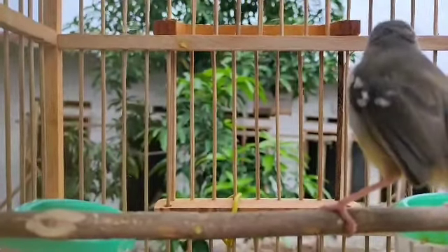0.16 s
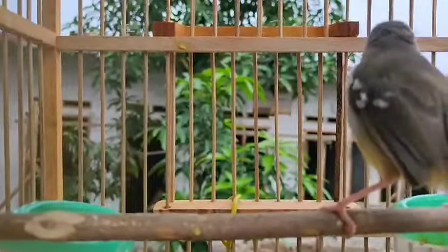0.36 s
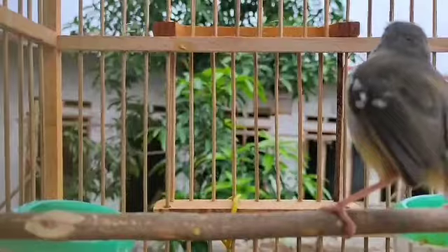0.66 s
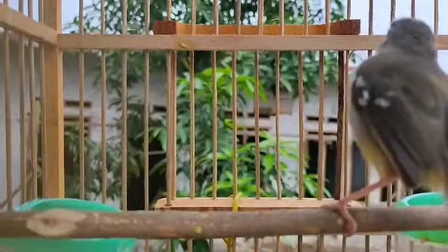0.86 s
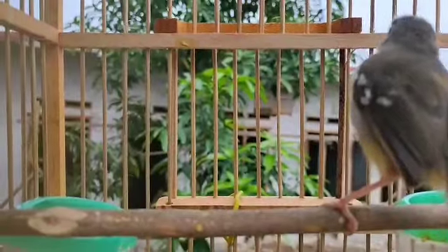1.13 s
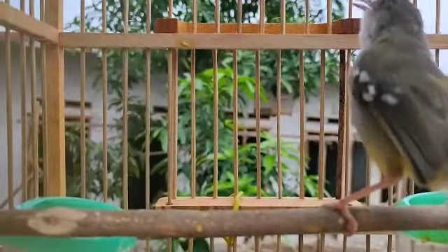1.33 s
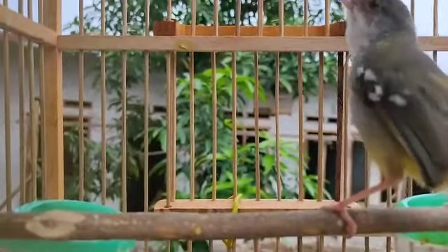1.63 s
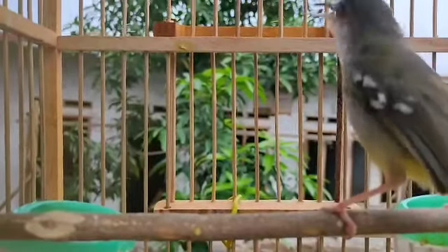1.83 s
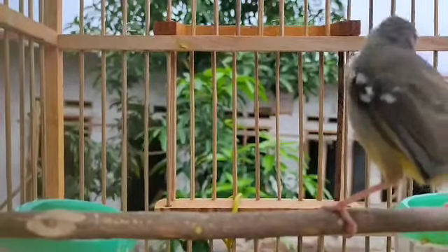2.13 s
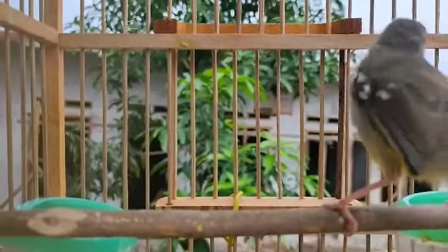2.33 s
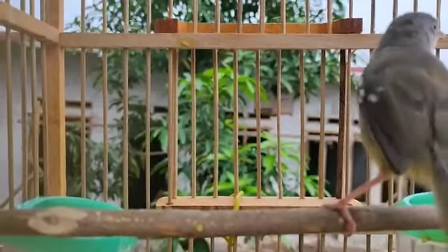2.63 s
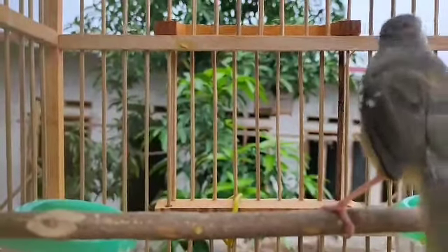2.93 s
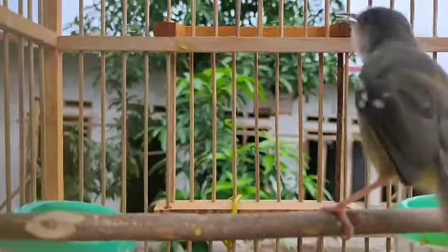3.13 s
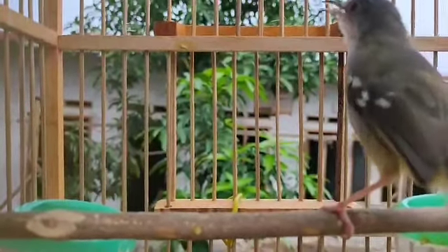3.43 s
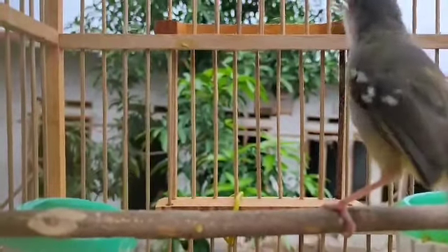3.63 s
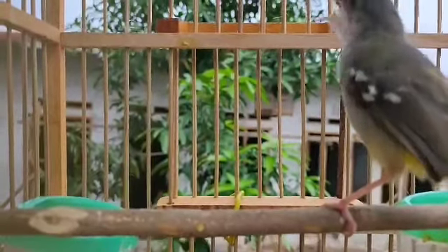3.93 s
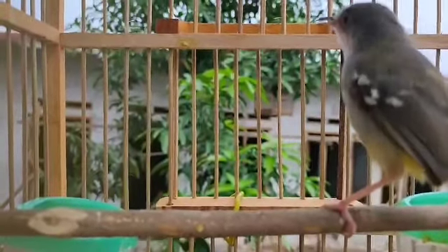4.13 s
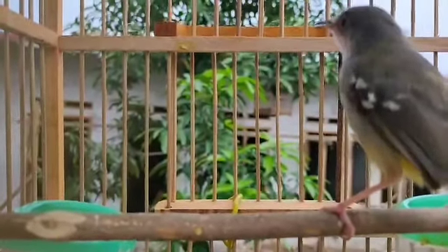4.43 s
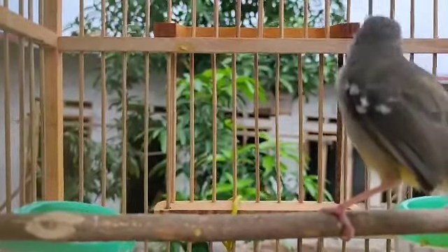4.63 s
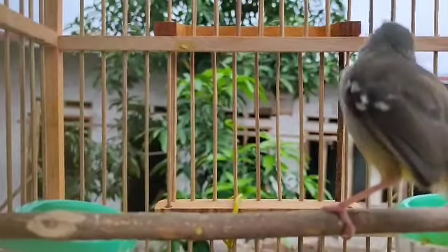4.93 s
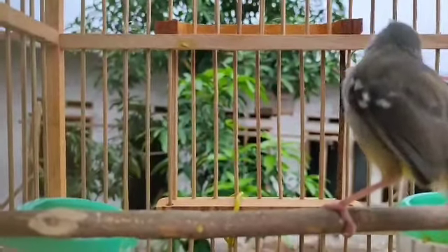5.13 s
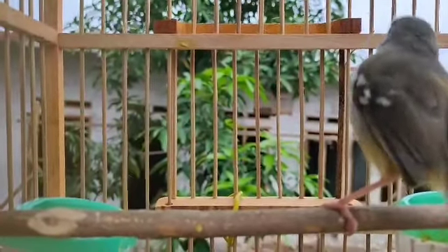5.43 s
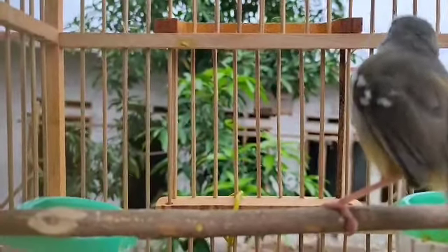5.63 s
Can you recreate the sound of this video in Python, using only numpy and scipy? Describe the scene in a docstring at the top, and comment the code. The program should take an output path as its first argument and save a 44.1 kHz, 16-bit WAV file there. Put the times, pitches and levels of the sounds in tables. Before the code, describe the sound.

A quiet outdoor yard between houses. For the first 1.3 seconds a thin high hiss flutters about thirteen times a second, with faint distant calls and soft low bumps; at about 0.9 seconds a short dull knock hits the cage frame, mostly on the left. At 1.4 seconds the caged bird, very close, gives a brief hoarse nasal call with two quick upward swings that sinks away. From 1.7 to 4.2 seconds come thirteen loud, piercing notes, roughly five a second: each flicks up reedily, peaks as a pure high whistle and slides down fast. The last five dip low and swing up again, sounding longer. Each rings briefly off the walls, with slight air puffs. After a quiet gap, about five softer, falling chirps answer from farther away between 4.6 and 5.2 seconds, blurred by reflections. Near 5.4 seconds soft bumps and the fluttering hiss return until the end.

```python
"""Outdoors between houses: a caged prinia sings close to the microphone, a nasal opening call, then 13 loud notes.
Each note is a swept oscillator: reedy upward flick, near-sine arch, slide down; decaying noise rings as the yard.
Farther falling chirps answer late, the lower ones with a strong octave in mid-fall; faint noise bands are
distant calls and one broad patch of hiss at the start. Before and after the song, pulsed noise makes a high
hiss and decaying noise makes soft low bumps; one short low sine is a knock on the cage frame."""
import sys
import numpy as np
from scipy import signal
from scipy.fft import rfft, irfft, next_fast_len
from scipy.io import wavfile
from scipy.ndimage import uniform_filter1d, minimum_filter1d

SR = 44100
rng = np.random.default_rng(int(sys.argv[2]) if len(sys.argv) > 2 else 0)


def wrap_up_sound(samples):
    """Save the sound to the file named by the first command line argument, as 16-bit audio."""
    columns = np.atleast_2d(samples).T
    # keep every value between -1 and 1, then stretch to whole-number steps
    tamed = np.clip(columns, -1, 1)
    steps = np.round(tamed * 32767).astype(np.int16)
    wavfile.write(sys.argv[1], SR, steps)


N = 254898
TIME = np.arange(N) / SR


def from_db(db):
    """Decibels to amplitude gain."""
    return 10 ** (np.asarray(db) / 20)


def rms_one(x):
    """Scale to rms 1."""
    return x / np.sqrt(np.mean(x ** 2) + 1e-20)


def at_hz(points, hz):
    """Interpolate a spectrum on a log-frequency axis."""
    f, value = np.transpose(points)
    return np.interp(np.log(np.maximum(hz, 1)), np.log(f), value)


def bin_hz(size):
    """Frequencies of the rfft bins."""
    return np.arange(size // 2 + 1) * SR / size


def coloured(x, spectrum):
    """Zero-phase filter with a smooth frequency response."""
    length = x.shape[-1]
    size = next_fast_len(length + 4096)
    gain = from_db(at_hz(spectrum, bin_hz(size)))
    return irfft(rfft(x, size) * gain, size)[..., :length]


def panned(pair, balance):
    """Share the power at each frequency between left and right; balance is left minus right, dB."""
    sides = []
    for sign in (1, -1):
        sides.append([(hz, 10 * np.log10(2 / (0.5 + 10 ** (-sign * db / 10)))) for hz, db in balance])
    return np.array([coloured(x, side) for x, side in zip(pair, sides)])


def noise(spectrum, alike):
    """Coloured stereo noise of rms 1; alike is the power share common to both sides."""
    alike = np.clip(alike, 0, 1)
    common = np.sqrt(alike) * rng.standard_normal(N)
    separate = np.sqrt(1 - alike) * rng.standard_normal((2, N))
    return rms_one(coloured(common + separate, spectrum))


def drift(cutoff_hz, size):
    """Smooth random wavering of spread 1: lowpassed noise, filter start-up discarded."""
    sos = signal.butter(2, min(cutoff_hz, SR / 4), fs=SR, output="sos")
    white = rng.standard_normal(max(size, SR // 2) + SR // 4)
    return rms_one(signal.sosfilt(sos, white)[SR // 4:])[:size]


def delayed(x, ms):
    """The same sound a little later."""
    return np.interp(TIME - ms / 1000, TIME, x, left=0)


def share(t, start_s, length_s):
    """Linear progress of a movement, 0 to 1."""
    return np.clip((t - start_s) / max(length_s, 1e-4), 0, 1)


def stretch(start_s, length_s):
    """Sample indices of one note and the time since it began."""
    t = np.arange(int(length_s * SR)) / SR
    return int(start_s * SR) + np.arange(len(t)), t


def envelope(t, db, attack_s, release_s):
    """Amplitude of a note: linear attack and release around its level as sine rms."""
    return np.sqrt(2) * from_db(db) * share(t, 0, attack_s) * share(t[-1] - t, 0, release_s)


def phase_of(hz, jitter):
    """Phase of a slightly unsteady oscillator."""
    return 2 * np.pi * np.cumsum(hz * (1 + jitter * drift(490, len(hz)))) / SR


def partial(multiple, hz, phase):
    """One overtone, muted near and above Nyquist."""
    return np.sin(multiple * phase) * (multiple * hz < .45 * SR)


# Outdoor air, low part: f/Hz, relative density/dB
AIR_SPECTRUM = [(15, -41), (25, -3), (75, -8.5), (157, -8), (389, -22.5), (445, -23.5), (859, -23.5),
                (1110, -24), (1400, -43.5), (1820, -75.5), (3080, -120)]


def quiet_air():
    """Steady noise: a low floor plus a much fainter treble part."""
    low = from_db(-73.5) * noise(AIR_SPECTRUM, alike=0.67)
    treble = noise([(1000, 0.5), (6000, -7.0), (9000, -24), (16000, -21)], alike=0.13)
    return low + from_db(-80.0) * treble


# Hiss base level under the swells: t/s, level/dB
HISS_LEVEL = [(0, -52.5), (.18, -59.5), (.27, -51), (.4, -56), (.9, -55), (1.3, -55), (1.39, -60),
              (1.7, -83.5), (5.39, -76), (5.43, -62.5), (5.78, -55)]
# Hiss colour: f/Hz, relative density/dB
HISS_SPECTRUM = [(350, -60), (600, -38), (834, -28.5), (970, -36.5), (1070, -42), (1590, -10),
                 (2570, -16.5), (3430, -6.5), (3890, -6.5), (6550, 6), (8050, -7.5), (9490, -27.5),
                 (11500, -32.5), (16000, -41)]
# Hiss balance: f/Hz, left minus right/dB
HISS_PAN = [(1300, 0), (2400, 0.5), (4400, 5), (8100, 5.5), (15000, -0.5)]
# Runs of swells: start t/s, end t/s, rate/(1/s)
HISS_RUNS = [(.042, 1.33, 13.05), (5.424, 5.76, 11)]
SWELL_DB, SWELL_SPREAD_DB = -52.5, 4.1


def hiss(rise_s, fall_s, flicker_db):
    """High noise swelling 11-13 times a second; exponential swells of random strength add in power."""
    power = from_db(np.interp(TIME, *np.transpose(HISS_LEVEL))) ** 2
    steady = from_db(flicker_db * drift(90, N)) * panned(noise(HISS_SPECTRUM, alike=0.067), HISS_PAN)
    times = np.concatenate([np.arange(start, end, 1 / rate) for start, end, rate in HISS_RUNS])
    strengths_db = SWELL_DB + SWELL_SPREAD_DB * rng.standard_normal(len(times))
    for s, db in zip(times, strengths_db):
        distance = np.maximum((s - TIME) / rise_s, (TIME - s) / fall_s)
        power = power + from_db(db) ** 2 * np.exp(-np.minimum(distance, 20))
    return np.sqrt(power) * steady


# Low bumps: t/s, level before decay and pan/dB, t60/s
BUMPS = [(.01, -64.5, 0.98), (.11, -64.5, 1), (.93, -53.5, 0.57), (5.36, -67.5, 0.485), (5.44, -64, .6)]
# Bump colour: f/Hz, relative density/dB
BUMP_SPECTRUM = [(15, -39), (25, -2), (97, 2.5), (145, -3), (233, -25), (314, -29), (500, -38), (650, -74),
                 (1100, -120)]


def bumps(rise_s, pan_db):
    """Soft, dull knocks: low noise under exponential decays, louder on the left."""
    level = np.zeros(N)
    for s, db, t60 in BUMPS:
        level += from_db(db - 60 * np.clip((TIME - s) / t60, 0, 2)) * share(TIME, s, rise_s)
    return level * noise(BUMP_SPECTRUM, alike=0.81) * from_db([[pan_db / 2], [-pan_db / 2]])


# Faint noise bands, distant calls and one broad patch of hiss at the start:
# start t/s, end t/s, centre f/Hz, width/Hz, level/dB
FAINT_BANDS = [(0.194, 0.332, 3520, 250, -59), (0.37, 0.522, 1010, 302, -69),
               (0.926, 1.027, 1525, 200, -66), (1.14, 1.35, 1950, 300, -71), (.02, .3, 2700, 700, -67),
               (4.89, 5.2, 733, 45, -74.5), (4.875, 5.19, 1523, 130, -71), (4.875, 5.03, 1020, 130, -72),
               (4.88, 4.99, 2246, 196, -65)]


def faint_bands(fade_s):
    """Each band is a carrier with two random quadrature amplitudes, faded in and out."""
    out = np.zeros(N)
    for start, end, hz, width, db in FAINT_BANDS:
        gate = np.clip(np.minimum(TIME - start, end - TIME) / fade_s, 0, 1)
        phase = 2 * np.pi * hz * TIME
        band = drift(width / 2, N) * np.sin(phase) + drift(width / 2, N) * np.cos(phase)
        out += from_db(db) * gate * band
    return out


def thud(start_s, hz, db, t60):
    """One soft knock on the cage frame: a few low decaying cycles, mostly on the left."""
    t = np.clip(TIME - start_s, 0, 1)
    swing = np.sin(2 * np.pi * hz * t) * (1 - np.exp(-(t * hz) ** 2))
    return swing * from_db(db - 60 * np.minimum(t / t60, 2)) * from_db([[0], [-10]])


def call(span, hz, level, octave_by_pitch, jitter, half_db, upper_db):
    """Slightly hoarse note: octave set by pitch, weak upper overtones, half-order lines from uneven cycles."""
    phase = phase_of(hz, jitter)
    halves = from_db(half_db) * (partial(3 / 2, hz, phase) + partial(5 / 2, hz, phase) / 10)
    octave = from_db(at_hz(octave_by_pitch, hz)) * (partial(2, hz, phase) + halves)
    upper = sum(partial(k, hz, phase) / k / (1 + (k * hz / 9000) ** 4) for k in range(3, 10))
    hoarse = 1 + .08 * drift(500, len(span))
    out = np.zeros(N)
    out[span] = level * hoarse * (np.sin(phase) + octave + from_db(upper_db) * upper)
    return out


# Opening call track: t/s, pitch f/Hz, fundamental level before the mix/dB
OPENING_TRACK = [(1.392, 1380, -34), (1.402, 3705, -14.5), (1.412, 1628, -27.5), (1.425, 2580, -12.5),
                 (1.436, 2530, -14.5), (1.45, 1714, -30), (1.459, 1565, -30), (1.48, 1752, -26.5),
                 (1.517, 1560, -29.5), (1.551, 1282, -42.5), (1.566, 1110, -61)]
# Octave overtone, dominant at low pitch: pitch f/Hz, level re fundamental/dB
OPENING_OCTAVE = [(1250, 18), (1450, 15), (1600, 7.5), (1760, 4.5), (2400, -29), (3700, -38)]


def opening_call(fade_s):
    """Two quick upward swings, then a low nasal note that sinks away."""
    s, pitch, level = np.transpose(OPENING_TRACK)
    span, t = stretch(s[0], s[-1] - s[0])
    hz, db = [uniform_filter1d(np.interp(s[0] + t, s, c), size=110) for c in (pitch, level)]
    amplitude = envelope(t, db, fade_s, fade_s)
    return call(span, hz, amplitude, OPENING_OCTAVE, jitter=.009, half_db=-12, upper_db=-12)


def beak(voice, low_hz):
    """Highpass: so small a bird radiates almost nothing below about a kilohertz."""
    return signal.sosfilt(signal.butter(6, low_hz, "high", fs=SR, output="sos"), voice)


# Air noise of the voice: f/Hz, relative density/dB
RASP_SPECTRUM = [(300, -25.5), (900, -24), (1600, -2.5), (5000, 5), (7500, 2), (9300, 3.5), (11000, -19),
                 (12400, 0), (13700, -8.5), (15200, 2.5)]


def rasp(voice, rasp_db, soft_edge_db, flicker_db):
    """Air noise follows the voice's slope; a wider smoothing window softens the noise's start and end."""
    force = np.gradient(voice) ** 2
    wide = uniform_filter1d(uniform_filter1d(force, size=660), size=440)
    narrow = uniform_filter1d(force, size=130)
    effort = np.sqrt(np.abs(narrow + from_db(soft_edge_db) ** 2 * wide))
    return from_db(rasp_db + flicker_db * drift(120, N)) * effort * noise(RASP_SPECTRUM, alike=0.13)


# Diffuse tail colour: f/Hz, gain/dB
YARD_COLOUR = [(300, -5.5), (1200, -0.5), (2000, -2.5), (3000, -1.5), (4500, -2.5), (6200, -1), (7500, -10),
               (10000, -3), (15000, -8.5)]


def yard(x, t60, build_s):
    """Diffuse reflections from the houses: convolution with noise that builds quickly and decays."""
    t = TIME[:SR]
    tail = rng.standard_normal((2, SR)) * from_db(-60 * t / t60) * (1 - np.exp(-t / build_s))
    tail = coloured(tail / np.sqrt(np.sum(tail ** 2, axis=1, keepdims=True)), YARD_COLOUR)
    return signal.fftconvolve(x[None], tail, axes=1)[:, :N]


# Stereo phase of the voice: f/Hz, left lead/rad
SONG_PHASE = [(0, 1), (950, -1.74), (2070, -0.37), (2500, -1.92), (3530, 0.57), (4570, -5.5), (5940, -10),
              (6460, -18), (7150, -17), (8790, -18), (10700, -10.5), (13200, 1), (14500, -5.5),
              (15700, -3.5)]
# Reflections from cage and wall: delay/ms, left level/dB, right level/dB
ECHOES = [(1.3, -17.5, -31), (2.705, -27.5, -11.5), (4.652, -28, -11), (8, -25, -14.5), (21, -20.5, -27)]
# Voice balance: f/Hz, left minus right/dB
SONG_PAN = [(60, -2.5), (92, -2), (140, -16.5), (210, -3), (330, -10), (500, 1), (770, 6), (1170, -3.5),
            (1790, -0.5), (2740, -5), (4190, -2.5), (6410, 3.5), (9810, -30.5), (15000, -1.5)]


def cage(voice):
    """The two ports hear the bird out of phase; near-surface echoes make each glide flutter."""
    size = next_fast_len(N + 4096)
    lead = np.interp(bin_hz(size), *np.transpose(SONG_PHASE))
    left_direct = irfft(rfft(voice, size) * np.exp(1j * lead), size)[:N]
    echoes = sum(from_db([[left], [right]]) * delayed(voice, ms) for ms, left, right in ECHOES)
    return panned(np.array([left_direct, voice]) + echoes, SONG_PAN)


# Levels in both note tables precede CARRYING and the mix; puff level precedes its envelope and pan.
# Notes that slide and stop: t/s, flick/s, arch/s, top f/Hz, slide/s, end f/Hz, slide bend (0 = straight),
# flick level/dB, arch level/dB, slide-end level/dB, slide roughness (0-1), air puff level/dB
SLIDES = [(1.688, .011, 0.019, 6305, .055, 2730, 2.3, -33.5, -16.5, -11.5, .5, -62),
          (2.100, 0.012, .0245, 6075, .038, 2907, 4.04, -33.5, -13, -17, 0.77, -81),
          (2.261, .012, 0.024, 6220, 0.041, 2984, 2.8, -34.5, -7.5, -20.5, .2, -65.5),
          (2.425, .012, .023, 5990, 0.041, 2873, 0.12, -35.5, -8, -16.5, .2, -75.5),
          (2.999, .012, 0.019, 6147, 0.053, 2490, 1.7, -31.5, -9, -12.5, .2, -64)]
# Notes whose slide is caught, swings up or levels off, then sags: same columns, then
# rise/s, crest f/Hz, sag/s, last f/Hz, crest level/dB
HOOKS = [(1.877, .012, 0.028, 6220, .015, 4037, 2.5, -33, -12, -13.5, .4, -54, .002, 4015, .05, 2690, -12),
         (2.616, 0.015, .022, 6263, .023, 3240, 1, -31, -11, -13.5, 0.2, -60.5, 0.0081, 3188, 0.017, 1500, -13),
         (2.805, 0.015, .022, 6237, .041, 1590, 0.43, -32, -10, -16, 0.19, -70, 0.0098, 1912, 0.0092, 1530, -11.5),
         (3.175, .011, .0158, 5970, 0.04, 2078, 3.5, -33, -11, -8.5, 0.95, -71, .024, 2520, 0.0037, 2420, -17.5),
         (3.3756, .012, 0.021, 6195, 0.03, 1368, 0.16, -35, -14.5, -9, 0.92, -59.5, 0.03, 3383, .032, 3064, -12.5),
         (3.602, .012, 0.017, 6100, 0.03, 1400, -0.2, -31.5, -12, -9.5, 0.48, -53.5, .031, 3432, .023, 3110, -10.5),
         (3.8245, .012, .0145, 6128, .034, 1316, -0.6, -34.5, -11.5, -7.5, 0.63, -52, .033, 3300, 0.031, 2764, -10),
         (4.061, .010, .0115, 5990, .030, 1376, 2.0, -54, -11, -10, 0.98, -54, .0255, 3612, 0.048, 2308, -10)]
# Throat and beak resonance: pitch f/Hz, gain/dB
CARRYING = [(1200, -32), (1550, -18), (2050, -9.5), (2400, -10.5), (3000, -2), (3500, -1), (4000, -3.5),
            (4330, -3), (4600, 3), (4900, 2), (5400, 0), (6200, -.5)]
FLICK_FROM_HZ, FLICK_TO_HZ, FLICK_CURVE = 1300, 5220, 1.4
ARCH_FLATNESS, RISE_CURVE, SAG_CURVE = 2.3, 1.7, 0.88
ATTACK_S, SWELL_CURVE, RELEASE_S = 0.0058, 3.1, .014
DROOP_S, DROOP_SHARE = .008, 0.39
# Random tremble of a rough slide: bandwidth, pitch share and level depth at full strain
TREMBLE_HZ, TREMBLE_SHARE, TREMBLE_DB = 260, .035, 3


def note(start_s, flick_s, arch_s, top_hz, slide_s, end_hz, bend, flick_db, arch_db, end_db,
         roughness, puff_db, *hook):
    """Samples, pitch and amplitude of one note: flick, arch, slide, optional hook, closing droop."""
    rise_s, crest_hz, sag_s, last_hz, crest_db = hook or (0, end_hz, 0, end_hz, end_db)
    slide_at = flick_s + arch_s
    rise_at = slide_at + slide_s
    droop_at = rise_at + rise_s + sag_s
    span, t = stretch(start_s, droop_at + DROOP_S)
    flick = share(t, 0, flick_s)
    arch = share(t, flick_s, arch_s)
    slide = share(t, slide_at, slide_s)
    rise = share(t, rise_at, rise_s)
    sag = share(t, rise_at + rise_s, sag_s)
    droop = share(t, droop_at, DROOP_S)

    bent_slide = np.expm1(-bend * slide) / np.expm1(-bend) if bend else slide
    hz = (FLICK_FROM_HZ * (FLICK_TO_HZ / FLICK_FROM_HZ) ** flick ** FLICK_CURVE
          + (top_hz - FLICK_TO_HZ) * (1 - np.abs(2 * arch - 1) ** ARCH_FLATNESS)
          + (end_hz - FLICK_TO_HZ) * bent_slide
          + (crest_hz - end_hz) * rise ** RISE_CURVE
          + (last_hz - crest_hz) * sag ** SAG_CURVE)
    # least steady early in the slide
    strain = roughness * np.sin(np.pi * np.sqrt(slide))
    hz = hz * (1 + TREMBLE_SHARE * strain * drift(TREMBLE_HZ, len(t)) - DROOP_SHARE * droop)

    whistle_db = arch_db + (end_db - arch_db) * slide + (crest_db - end_db) * rise
    whistle_db = whistle_db + at_hz(CARRYING, hz) + TREMBLE_DB * strain * (drift(TREMBLE_HZ, len(t)) - 1)
    level_db = flick_db + (whistle_db - flick_db) * flick ** SWELL_CURVE
    return span, hz, envelope(t, level_db, ATTACK_S, RELEASE_S)


# Throat response to the reedy overtones: f/Hz, gain/dB
THROAT = [(2600, 0), (3800, -11), (5000, 7.5), (6800, 5), (8300, -0.5), (10000, -23.5), (15000, -24)]
# Pure-whistle overtones: multiple of pitch, level/dB before OVERTONES_BY_PITCH
WHISTLE_PARTIALS = [(.5, -31.5), (1.5, -33), (2, -29.5), (3, -37.5)]
# Overtone gain, least at the top and more during the slide: pitch f/Hz, gain/dB
OVERTONES_BY_PITCH = [(1500, 0), (3000, -1), (4300, 6), (5200, -1), (6100, -2.5)]


def song(reedy_db, low_reedy, break_hz):
    """The syrinx slaps shut while the pitch flicks up, then swings freely as a near sine."""
    out = np.zeros(N)
    for row in SLIDES + HOOKS:
        span, hz, level = note(*row)
        phase = phase_of(hz, jitter=.004)
        # reedy until the pitch first passes break_hz, slightly so again when it sinks low
        opening_flick = np.maximum.accumulate(hz) < break_hz
        reedy = uniform_filter1d(np.maximum(opening_flick, low_reedy * (hz < 2100)), size=44)
        # reedy overtones stop growing once the fundamental takes over
        drive = reedy * np.minimum(level, from_db(-20.5))
        reed = sum(from_db(reedy_db + at_hz(THROAT, k * hz)) * partial(k, hz, phase) for k in range(2, 9))
        overtones = sum(from_db(db) * partial(round(2 * k) / 2, hz, phase) for k, db in WHISTLE_PARTIALS)
        overtone_gain = from_db(3.5 * drift(200, len(span)) + at_hz(OVERTONES_BY_PITCH, hz))
        out[span] += level * (np.sin(phase) + overtones * overtone_gain) + drive * reed
    return out


# Puff colour: f/Hz, relative density/dB
PUFF_SPECTRUM = [(40, -7.5), (110, 1), (200, -2.5), (380, 0.5), (600, -5), (1000, -4.5), (1600, -27.5)]


def puffs(rise_s, t60):
    """The body jerks as each flick ends and stirs a little air: decaying noise, louder on the right."""
    level = np.zeros(N)
    for row in SLIDES + HOOKS:
        s, db = row[0] + row[1], row[11]
        level += from_db(db - 60 * np.clip((TIME - s - rise_s) / t60, 0, 2)) * share(TIME, s, rise_s)
    return level * noise(PUFF_SPECTRUM, alike=0.42) * from_db([[-2], [2]])


# Chirps from farther off: start t/s, length/s, first f/Hz, last f/Hz, time to mid-drop/s, drop scale/s,
# first level/dB, last level/dB (fundamental, before the mix)
FAR_CHIRPS = [(4.645, 0.082, 6490, 5220, 0.05, 0.015, -35, -42),
              (4.678, 0.088, 3915, 2445, 0.048, 0.041, -50.5, -48),
              (4.912, 0.064, 6600, 4645, 0.02, 0.046, -46, -56.5),
              (4.978, 0.062, 4416, 2355, .026, .04, -41.5, -47),
              (5.141, 0.073, 6365, 4990, 0.049, 0.013, -37.5, -40.5)]
# Octave overtone, strong only near 3300 Hz: pitch f/Hz, level re fundamental/dB
FAR_OCTAVE = [(2450, -11), (3300, 6), (3800, -11), (4700, -7), (5400, -59), (6500, -27)]
FAR_FADE_S = 0.018


def far_chirp(start_s, length_s, first_hz, last_hz, drop_at_s, drop_s, first_db, last_db):
    """A held pitch that drops to a lower one along an S curve."""
    span, t = stretch(start_s, length_s)
    drop = (1 + np.tanh(2 * (t - drop_at_s) / drop_s)) / 2
    hz = first_hz + (last_hz - first_hz) * drop
    level = envelope(t, first_db + (last_db - first_db) * drop, FAR_FADE_S, FAR_FADE_S)
    return call(span, hz, level, FAR_OCTAVE, jitter=.0074, half_db=-35, upper_db=-20)


def scene():
    """Mix the near bird, the far sounds, the hiss, the bumps and the quiet outdoor air."""
    background = quiet_air() + hiss(rise_s=.004, fall_s=0.011, flicker_db=1.5)
    knocks = bumps(rise_s=0.0074, pan_db=14.0) + thud(start_s=.905, hz=105, db=-18.5, t60=0.052)

    opening = opening_call(fade_s=.004)
    voice = beak(song(reedy_db=6.5, low_reedy=0.058, break_hz=4610) + opening, low_hz=1262)
    # the opening call drives an extra share of air noise
    breath_source = voice + from_db(-9) * beak(opening, low_hz=1262)
    airflow = rasp(breath_source, rasp_db=-20.0, soft_edge_db=-3.0, flicker_db=3.5)
    ringing = from_db(-16.5) * yard(voice + from_db(9.5) * airflow[0], t60=0.48, build_s=.003)
    near = from_db(-2.0) * cage(voice) + airflow + ringing + puffs(rise_s=0.0082, t60=0.28)

    chirps = sum(far_chirp(*row) for row in FAR_CHIRPS)
    # the left side is earlier and louder
    direct = np.array([chirps, delayed(chirps, ms=0.421)])
    answers = from_db(-0.5) * direct + from_db(2.0) * yard(chirps, t60=0.55, build_s=0.0012)
    far = answers * from_db([[2], [-2]]) + faint_bands(fade_s=0.037)
    return near + far + background + knocks


CUTOFF_HZ = 15900


def record(dry):
    """A fast limiter holds the highest peaks under full scale; a steep lowpass then cuts the top."""
    headroom = np.minimum(1, .95 / (np.abs(dry).max(axis=0) + 1e-9))
    gain = uniform_filter1d(minimum_filter1d(headroom, size=177), size=177)
    return coloured(dry * gain, [(CUTOFF_HZ - 300, 0), (CUTOFF_HZ + 500, -70)])


dry = scene()
out = record(dry)
wrap_up_sound(out)
```